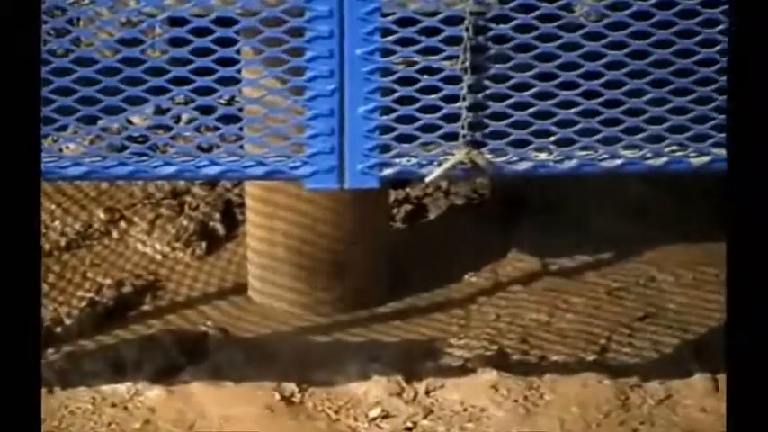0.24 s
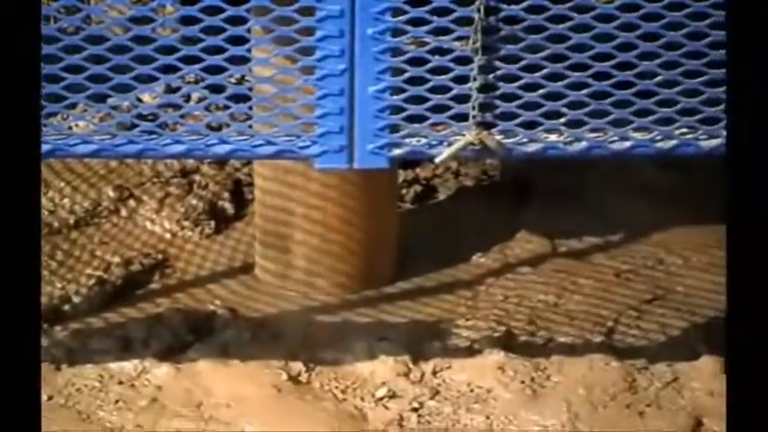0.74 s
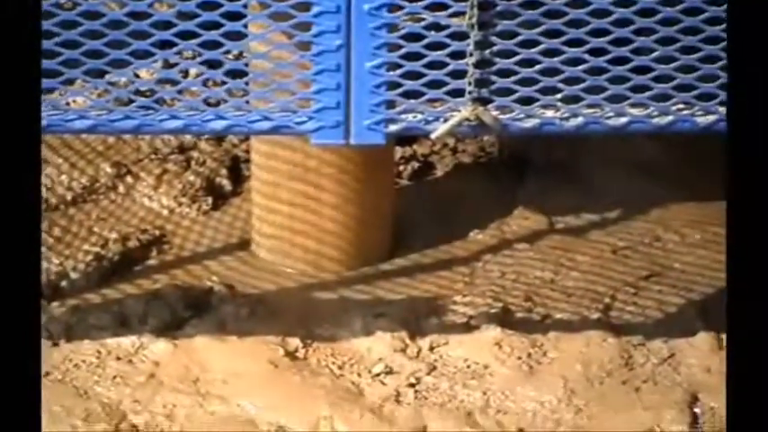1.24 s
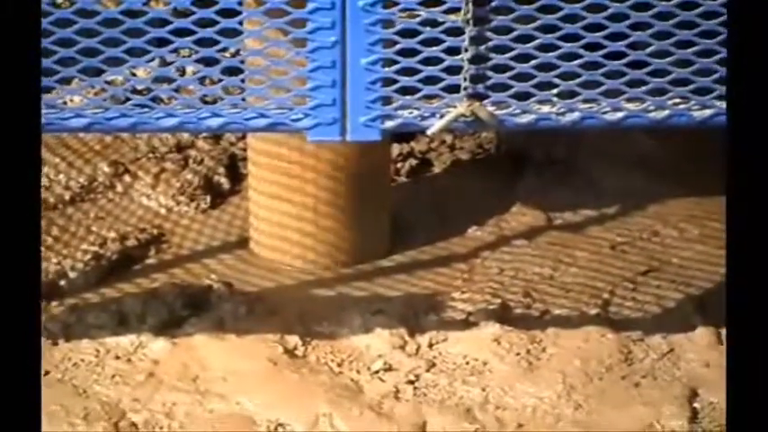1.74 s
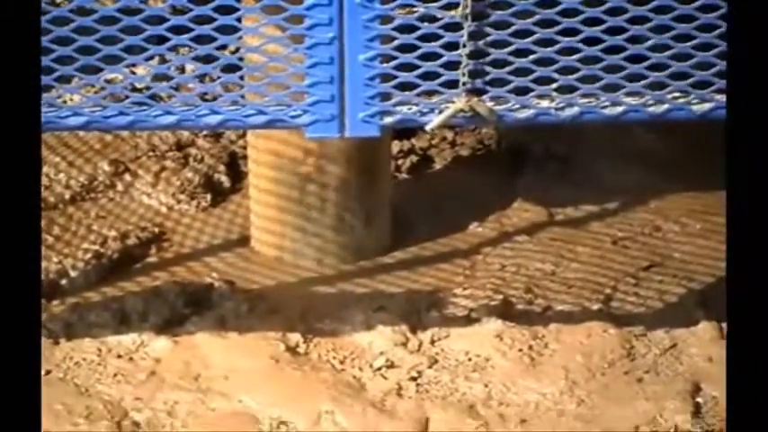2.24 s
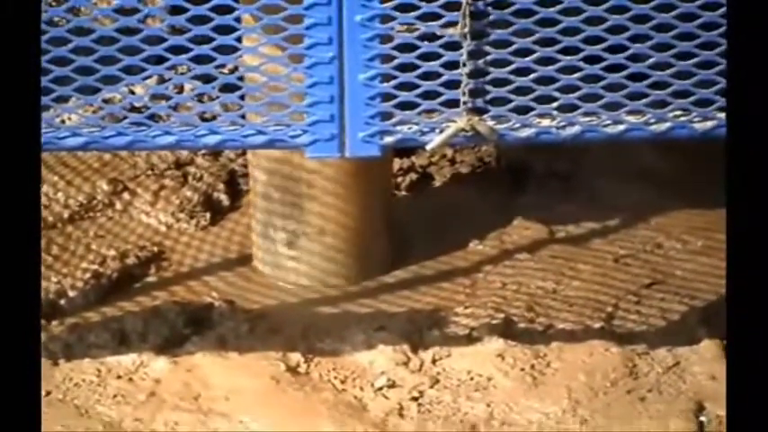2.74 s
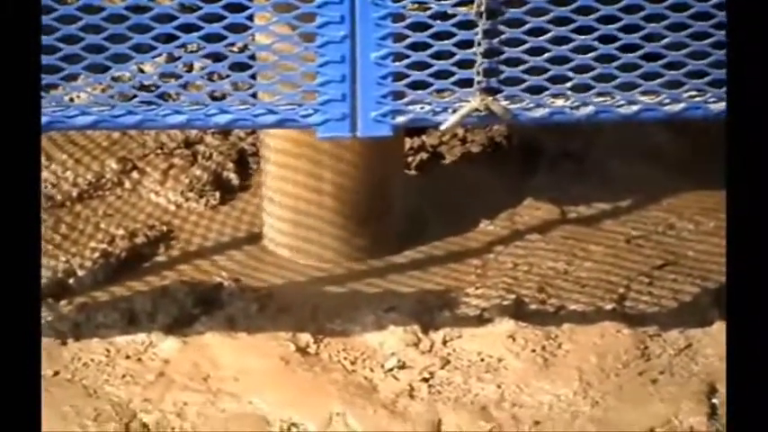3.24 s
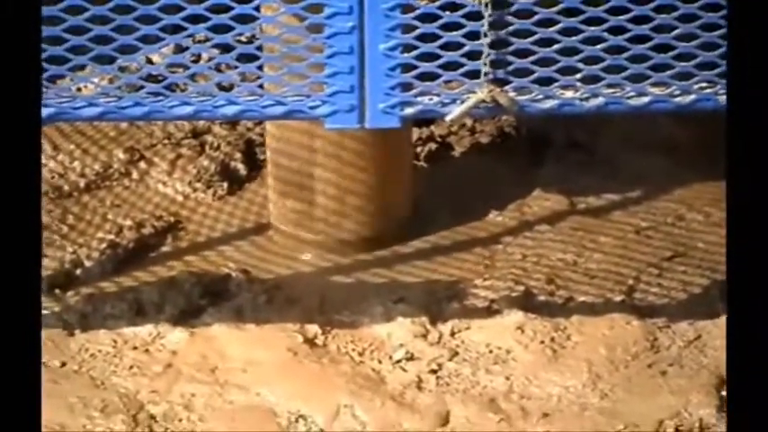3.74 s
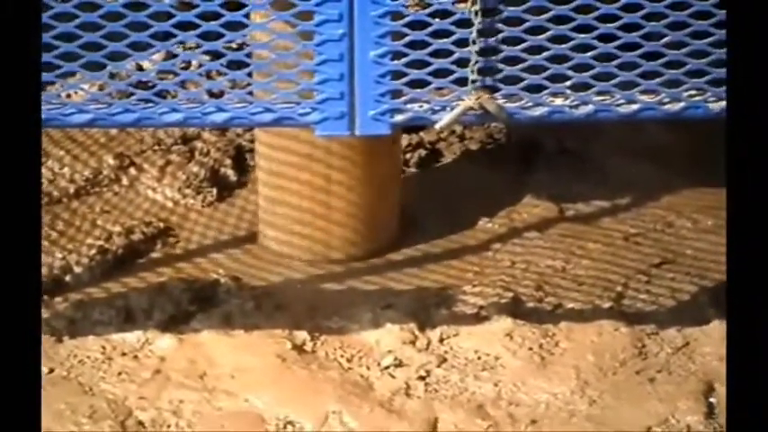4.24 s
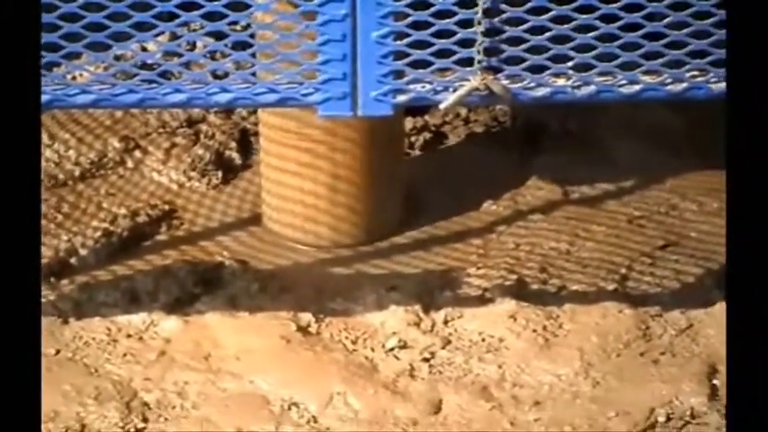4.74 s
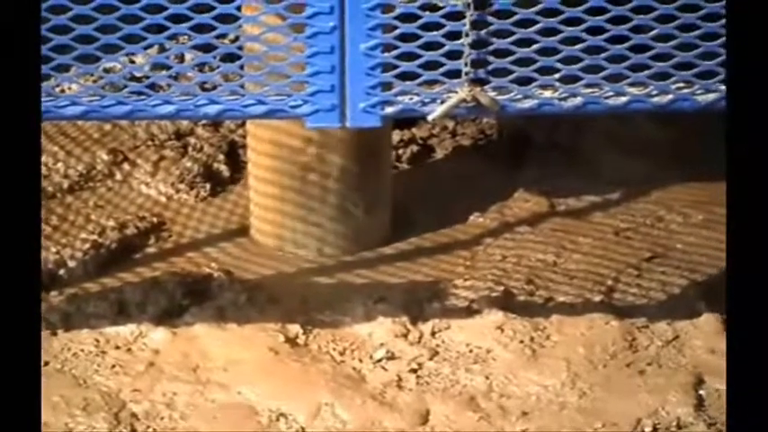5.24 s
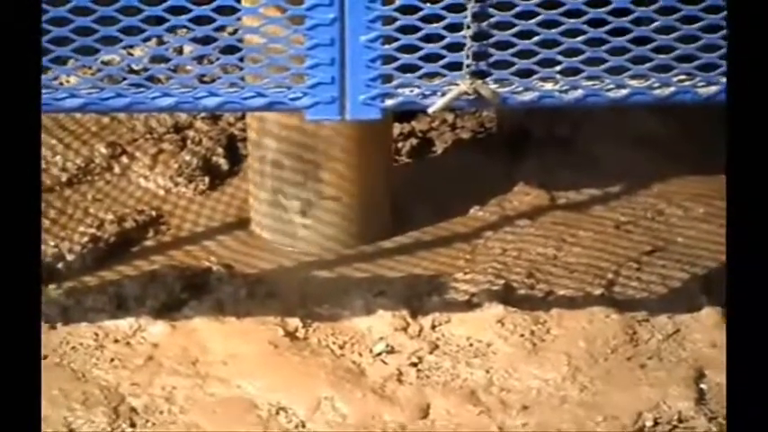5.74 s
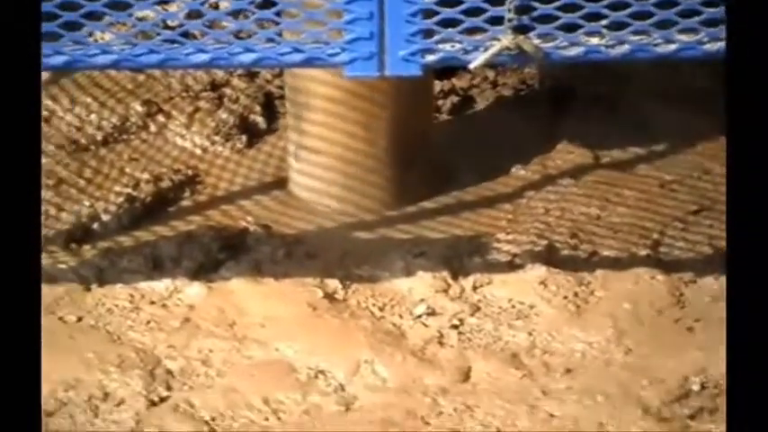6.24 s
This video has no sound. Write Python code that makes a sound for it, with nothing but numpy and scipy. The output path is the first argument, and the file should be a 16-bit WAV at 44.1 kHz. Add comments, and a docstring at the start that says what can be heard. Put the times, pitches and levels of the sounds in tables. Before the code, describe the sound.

A drilling rig runs outdoors, its diesel engine clattering under a droning fan, a low hum, whining gears and a faint hiss. Midway the load eases: the engine speeds up slightly, the hiss fades and the steel drill pipe scrapes several times in gritty mud. The engine settles back, and gusts of wind rumble and thump on the microphone, briefly pushing the whole sound down.

```python
"""A diesel clatters under a droning fan and a low hum: a truck-mounted drilling rig at work outdoors.
Six cylinders knock, the exhaust booms, gears whine, fan blades chop the air and oil hisses in a valve.
For about two seconds the load eases: the engine speeds up, the hiss fades and the drill pipe scrapes
in gritty mud. Late gusts of wind thump the microphone, and a limiter briefly turns everything down."""
import sys
import numpy as np
from scipy import signal
from scipy.fft import rfft, irfft, next_fast_len
from scipy.io import wavfile

SR = 44100
rng = np.random.default_rng(int(sys.argv[2]) if len(sys.argv) > 2 else 0)


def generate_wav(sig):
    """Save sig (samples, or channels by samples) to the path in sys.argv[1] as 16-bit PCM at SR."""
    pcm = np.round(np.clip(np.atleast_2d(sig).T, -1, 1) * 32767).astype(np.int16)
    wavfile.write(sys.argv[1], SR, pcm)


N = 286209
TIME = np.arange(N) / SR


def from_db(db):
    """Turn decibels into a number to multiply a sound by."""
    return 10 ** (np.asarray(db) / 20)


def rms_one(x):
    """Scale a sound so that its average power is 1."""
    return x / np.sqrt(np.mean(x ** 2) + 1e-20)


def curve(rows):
    """Join (time, value) points with straight lines, giving a value for every sample."""
    return np.interp(TIME, *np.transpose(rows))


def swells(rows):
    """Add up smooth, bell-shaped rises and falls in loudness."""
    return sum(from_db(db) * np.exp(-(2 * (TIME - s) / length) ** 2) for s, length, db in rows)


def drift(rate_hz):
    """A random wobble of typical size 1; a higher rate wobbles faster."""
    r = np.exp(-80 * np.pi * rate_hz / SR)
    slow = signal.lfilter([1], [1, -2 * r, r * r], rng.standard_normal(N // 40 + 2002))[2000:]
    return np.interp(np.arange(N) / 40, np.arange(len(slow)), rms_one(slow))


def coloured(x, spectrum):
    """Make some pitches stronger and others weaker, fading beyond the table's ends; power 1."""
    hz, db = np.transpose(spectrum)
    size = next_fast_len(N + SR // 4)
    f = np.maximum(np.arange(size // 2 + 1) * SR / size, 1)
    edges = np.minimum(f / hz[0], 1) ** 2 * np.minimum(hz[-1] / f, 1) ** 2
    gain = from_db(np.interp(np.log(f), np.log(hz), db))
    return rms_one(irfft(rfft(x, size) * edges * gain, size)[:N])


def ring(x, hz, ring_s):
    """Each click in x starts a note that fades by 60 dB in ring_s seconds."""
    r, w = from_db(-60 / (ring_s * SR)), 2 * np.pi * hz / SR
    return signal.lfilter([0, np.sin(w)], [1, -2 * r * np.cos(w), r * r], x + 1e-18)


def tone(cycles, rough, flutter_hz):
    """A note of power 1 whose loudness and timing are shaken by swirling air."""
    angle = (2 * np.pi * ((cycles + rng.random()) % 1)).astype(np.float32)
    in_step, across = 1 + rough * drift(flutter_hz), rough * drift(flutter_hz)
    return rms_one(in_step * np.cos(angle) + across * np.sin(angle))


def clatter(turns, jitter_s=.00012, uneven_db=1.5, decay_s=0.027, cylinders=6):
    """Each cylinder knocks once in two engine turns and rings the engine block in its own way."""
    # tone colour of the block: (pitch [Hz], relative level [dB])
    block_colour = [(150, -26), (230, 9.5), (300, 3.5), (360, -4), (460, 3), (540, -7.5), (640, 3),
                    (790, -1.5), (900, -14), (1300, -4), (1750, -18.5), (2200, -15.5), (3300, -26.5),
                    (4500, -37)]
    out, age = np.zeros(N), TIME[:SR // 10]
    for cylinder in range(cylinders):
        ringing = rms_one(rng.standard_normal(len(age)) * np.exp(-age / decay_s))
        chance = rng.standard_normal((100, 2))
        firing_turns = 2 * (np.arange(len(chance)) + cylinder / cylinders)
        due = np.interp(firing_turns, turns, TIME, right=np.inf) + jitter_s * chance[:, 0]
        heard = (due > 0) & (due < TIME[-1])
        knocks = np.zeros(N)
        knocks[(due[heard] * SR).astype(int)] = from_db(uneven_db * chance[heard, 1])
        out += signal.fftconvolve(knocks, ringing)[:N]
    return coloured(out, block_colour)


def rushing_air(turns, throb=0.045, flicker_db=0.64):
    """Intake and cooling air pulse with the three firings in each turn."""
    # tone colour of the air: (pitch [Hz], relative level [dB])
    air_colour = [(20, -7.5), (50, 3.5), (140, -3.5), (260, 5), (370, -3), (540, -4), (750, -2), (1350, -8),
                  (1750, -13), (2350, -14), (4100, -26.5), (5400, -28.5), (6900, -33.5), (10000, -43.5),
                  (11000, -56)]
    pulsing = (1 + throb * np.cos(6 * np.pi * turns)) * from_db(flicker_db * drift(8.8))
    return coloured(pulsing * rng.standard_normal(N), air_colour)


def exhaust(turns):
    """Three puffs a turn make a deep boom; weaker tones also follow the engine's speed."""
    # the boom: (time [s], level [dB])
    boom_levels = [(0.3, -29.5), (2.6, -29), (3.1, -29.5), (4.2, -34.5), (4.8, -28.5), (5.4, -23),
                   (6.49, -26)]
    # other exhaust and gear tones: (pitch [cycles per turn], level [dB])
    engine_tones = [(2, -39.5), (6, -44.5), (8, -37.5), (9, -40), (11, -41), (12, -35), (13, -47),
                    (30, -42), (31, -44), (32, -47), (33, -46), (36, -51.5), (37, -55), (40, -44),
                    (43, -52.5), (46, -49.5), (48, -45), (51, -48.5), (55, -47), (59, -54.5), (64, -55.5),
                    (80, -50.5), (88, -53.5), (99, -52.5)]
    boom = from_db(curve(boom_levels)) * tone(3 * turns, rough=.08, flutter_hz=6)
    return boom + sum(from_db(db) * tone(round(per_turn) * turns, rough=0.32, flutter_hz=3.16)
                      for per_turn, db in engine_tones)


def gear_whine(turns, throb_hz=3.2, throb_depth=0.3, dip_s=.32):
    """The timing gears whine with a slow throb, fading as the load eases; a thin whine comes and goes."""
    # timing gear whine before the throb: (time [s], level [dB])
    whine_levels = [(0.3, -30), (2.2, -33), (2.75, -29), (3.5, -40), (4.4, -35), (4.85, -30.5), (6.49, -28)]
    # swells of the thin, high whine: (time of peak [s], length [s], level [dB])
    high_swells = [(1.85, 1.1, -52), (3.1, 0.27, -49), (4.45, .2, -49)]
    throb = 1 - throb_depth * np.cos(2 * np.pi * throb_hz * (TIME - dip_s))
    low = from_db(curve(whine_levels)) * throb * tone(24 * turns, rough=0.37, flutter_hz=15)
    return low + swells(high_swells) * tone(132 * turns, rough=0.89, flutter_hz=35)


def fan(turns, load_db, blades_per_turn=10.155):
    """Blades, driven by a belt from the engine, chop the air: louder and harsher as the load eases."""
    blades = blades_per_turn * turns
    drone = tone(blades, rough=0.097, flutter_hz=17)
    octave = from_db(-19.5 - .5 * load_db) * tone(2 * blades, rough=0.17, flutter_hz=5)
    return from_db(-20.5 - 0.26 * load_db) * (drone + octave)


def valve(load_db):
    """Oil squeezes through a valve with a bright hiss and thin whistles, louder under load."""
    # tone colour of the hiss: (pitch [Hz], relative level [dB])
    hiss_colour = [(4500, -9), (6400, 0.5), (7200, -5.5), (8300, -2), (10200, 1), (10900, -21),
                   (11900, -11), (13000, -21)]
    # the whistles: (pitch [Hz], spread of pitch [Hz], relative level [dB])
    whistle_notes = [(3322, 67, -55), (6300, 60, -69), (7700, 60, -69.5), (8150, 40, -71), (8200, 60, -66),
                     (8440, 40, -65.5), (9200, 60, -74.5), (11900, 250, -76.5)]
    whistles = np.zeros(N)
    for hz, width, db in whistle_notes:
        ring_s = np.log(1000) / (np.pi * width)
        whistles += from_db(db) * rms_one(ring(rng.standard_normal(N), hz, ring_s))
    hiss = from_db(-58.5) * coloured(rng.standard_normal(N), hiss_colour)
    return from_db(load_db) * (hiss + whistles)


def diesel(loaded_turns_per_s=25.47):
    """The engine and all it drives: as the load eases it runs faster and clatters louder."""
    # engine speed: (time [s], speed [turns per s])
    speeds = [(0.3, 25.2), (1.05, 25.25), (1.6, 25.05), (2.3, 25.05), (2.65, 25.2), (3.0, 26.0),
              (3.4, 26.1), (3.7, 26.35), (3.85, 26.65), (4.1, 27.0), (4.3, 26.7), (4.6, 26.0), (5.0, 25.45),
              (5.25, 25.2), (6.1, 25.2), (6.49, 25.05)]
    # load on the drill, heard as oil pressure at the valve: (time [s], change in hiss [dB])
    loads = [(0.3, 1), (2.55, 1.5), (2.85, -6), (4.05, -4.5), (4.35, -0.5), (5.2, 1.5), (6.49, 1.5)]
    speed, load_db = curve(speeds), curve(loads)
    turns = np.cumsum(speed * (1 + 0.00093 * drift(8.1))) / SR
    racing = np.maximum(speed - loaded_turns_per_s, 0)
    knocking = from_db(-30.5 + 0.8 * racing) * clatter(turns)
    air = from_db(-26 + .55 * racing - .14 * load_db) * rushing_air(turns)
    return knocking + air + exhaust(turns) + gear_whine(turns) + fan(turns, load_db) + valve(load_db)


def hum():
    """Other machinery hums at a steady speed; its lowest note wavers against the exhaust."""
    # the hum: (pitch [Hz], level [dB])
    notes = [(59.8, -22.5), (107.2, -39.5), (222.3, -40.5)]
    return sum(from_db(db) * tone(hz * TIME, rough=0.1, flutter_hz=6.4) for hz, db in notes)


def wind(breeze_db=-43.5, thud_cycles=0.71):
    """Gusts rumble on the microphone; each strong swirl is a quick swing of pressure, heard as a thud."""
    # tone colour of the rumble: (pitch [Hz], relative level [dB])
    rumble_colour = [(20, 2), (36, 6), (60, -5), (110, 4), (190, 0.5), (350, -7.5), (700, -18), (1500, -33)]
    # gusts: (time of peak [s], length [s], level [dB])
    gusts = [(0.36, 0.22, -26), (1.67, 0.087, -28.5), (1.95, 0.26, -27.5), (4.45, .1, -22),
             (4.6, 0.28, -18.5), (5.07, .06, -15), (5.19, .05, -16), (5.38, .22, -15.5), (5.74, 0.38, -19),
             (6.2, 0.19, -25.5)]
    # the hardest thuds: (time [s], strength [dB], pitch [Hz])
    thuds = [(1.995, -12.5, 119), (4.45, -7.5, 346), (4.496, -5.5, 92.5), (4.552, -5.5, 168.9),
             (4.572, -10, 400), (4.666, -7.5, 139.3), (4.718, -7.5, 131), (5.087, -7, 700),
             (5.203, -6, 410), (5.2299, -2, 182), (5.234, -3.5, 403)]
    lumpy = rng.standard_normal(N) * from_db(1.6 * drift(23))
    out = (from_db(breeze_db) + swells(gusts)) * coloured(lumpy, rumble_colour)
    for s, db, hz in thuds:
        cycles = hz * (TIME - s)
        out += from_db(db) * np.sin(2 * np.pi * cycles) * np.exp(-(cycles / thud_cycles) ** 2)
    return out


def grit_ticks():
    """Flung grains hit steel, which rings very briefly."""
    # the hits: (time [s], strength [dB], contact time [s])
    hits = [(0.9612, -10.5, .00005), (1.2015, -19, 0.00014)]
    # notes of the steel: (pitch [Hz], relative level [dB], ring time [s])
    notes = [(2850, -7, .005), (5300, -4, 0.0056), (7760, -3.5, 0.0019), (9550, -6, 0.003),
             (12300, -21, .002)]
    clicks = np.zeros(N)
    for s, db, contact_s in hits:
        push = np.hanning(round(contact_s * SR) + 2)   # a longer contact sounds duller
        clicks[round(s * SR):][:len(push)] = from_db(db) * push / push.sum()
    return sum((-1) ** k * from_db(db) * ring(clicks, hz, ring_s)
               for k, (hz, db, ring_s) in enumerate(notes))


def pipe_scrapes(grain_db=2.5, ringing_db=-7):
    """Stones in the mud grind on the drill pipe and set it ringing, while sand rasps."""
    # scrapes: (start [s], length [s], stone level [dB], sand level [dB])
    scrapes = [(2.574, .08, -60, -46), (2.751, 0.049, -24.5, -39), (2.857, 0.022, -38, -45),
               (2.881, .02, -31.5, -53), (3.696, 0.036, -32.5, -46), (3.73, 0.016, -37, -48),
               (3.768, 0.056, -35, -40.5), (3.83, .04, -37, -44.5), (3.95, .033, -27, -55),
               (3.998, 0.016, -31.5, -54), (4.035, 0.048, -26.5, -54), (4.09, 0.2, -35.5, -60)]
    # tone colours of stones and sand: (pitch [Hz], relative level [dB])
    stone_colour = [(300, 13.5), (900, 0), (1300, -0.5), (2200, 1.5), (3000, -8), (4300, -9.5),
                    (8000, -38.5)]
    sand_colour = [(2000, -21), (4000, 5.5), (5400, 5), (6800, -2.5), (9800, -8.5), (11000, -23),
                   (13000, -20)]
    # notes of the pipe: (pitch [Hz], relative level [dB], ring time [s])
    notes = [(1340, -3, 0.033), (1440, -1, 0.025), (1900, -7, 0.036), (2260, -3.5, 0.03),
             (3500, -14.5, 0.033), (5280, -19, .03)]
    stone_gain, sand_gain = np.zeros((2, N))
    for s, length, stone_db, sand_db in scrapes:
        progress = np.clip((TIME - s) / length, 0, 1)
        swell = np.sqrt(np.abs(np.sin(np.pi * progress)))
        stone_gain += from_db(stone_db) * swell
        sand_gain += from_db(sand_db) * swell
    grains = rng.standard_normal((2, N)) * from_db(grain_db * np.array([drift(250), drift(400)]))
    stones = stone_gain * coloured(grains[0], stone_colour)
    sand = sand_gain * coloured(grains[1], sand_colour)
    ringing = sum(from_db(db + ringing_db) * rms_one(ring(stones, hz, ring_s))
                  for hz, db, ring_s in notes)
    return stones + sand + np.std(stones) * ringing


def scene():
    """The rig and the wind at one microphone."""
    return (diesel() + hum() + grit_ticks() + pipe_scrapes() + wind())[None]


def record(dry):
    """The sound cuts in; a limiter turns it down at peaks and slowly back up; the top treble is cut."""
    start_s, limit_db, release_s, cutoff_hz = 0.309, -4.5, 0.84, 14000
    x = dry * (TIME >= start_s)
    over_db = np.maximum(20 * np.log10(np.abs(x) + 1e-9) - limit_db, 0)
    fading = np.exp(-TIME / release_s)
    dip_db = np.maximum.accumulate(over_db / fading, axis=-1) * fading
    treble_cut = signal.cheby2(12, 60, cutoff_hz, fs=SR, output="sos")
    return signal.sosfilt(treble_cut, x * from_db(-dip_db))


dry = scene()
out = record(dry)
generate_wav(out)
```